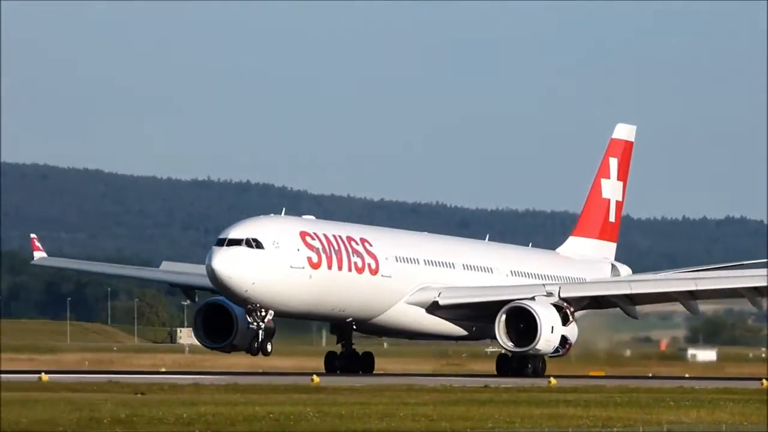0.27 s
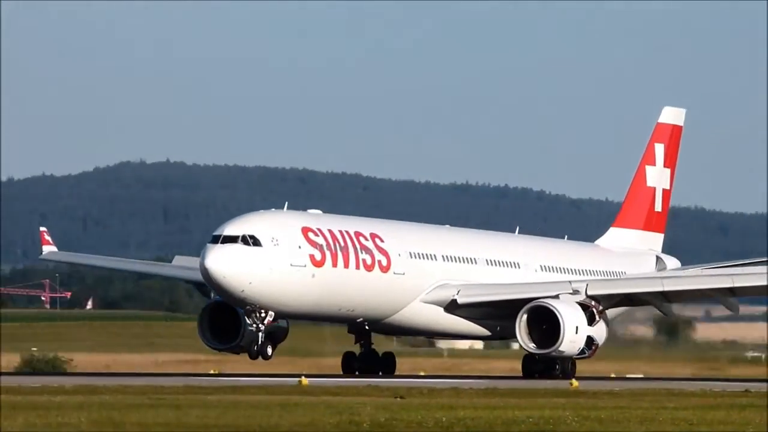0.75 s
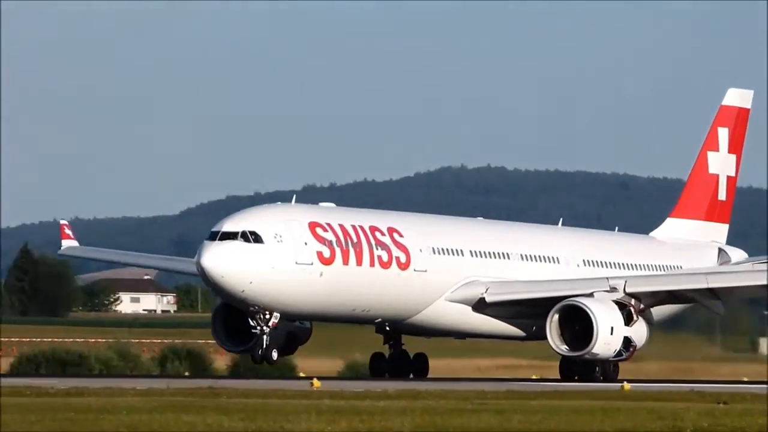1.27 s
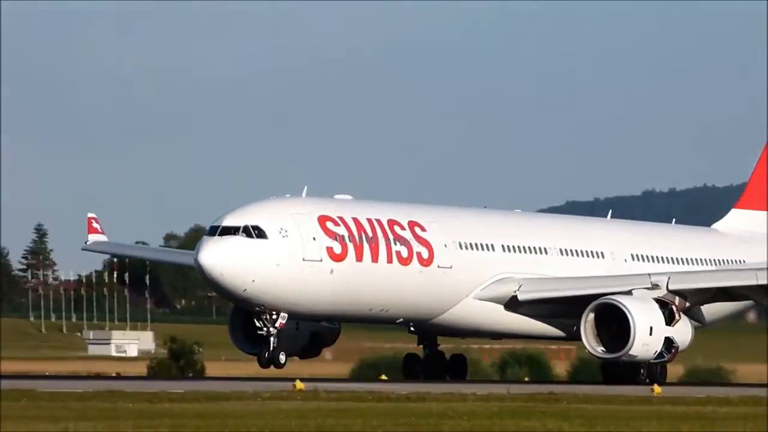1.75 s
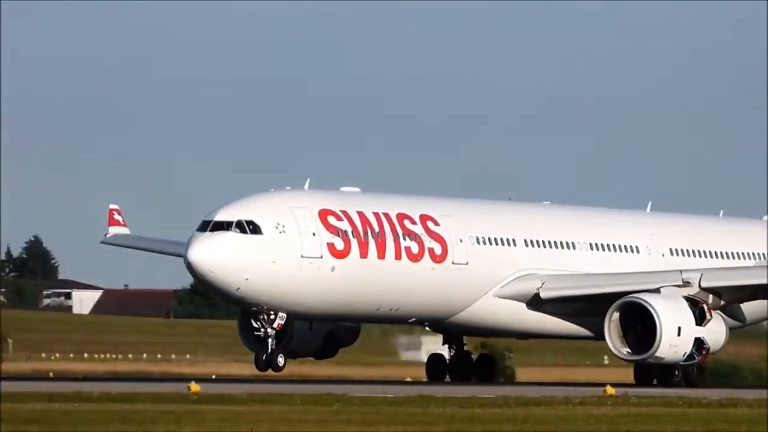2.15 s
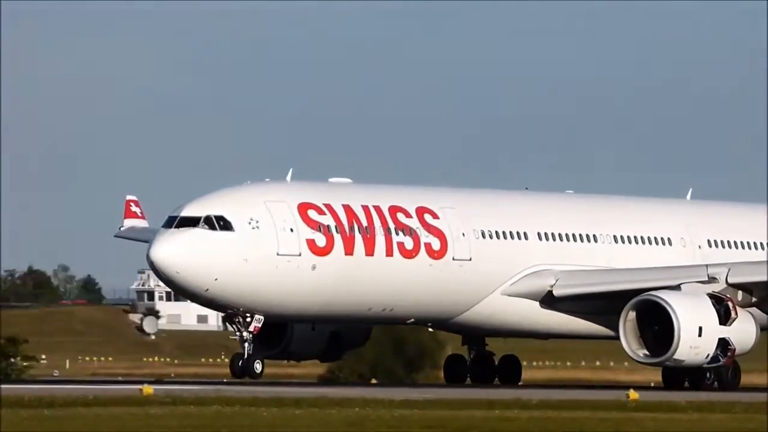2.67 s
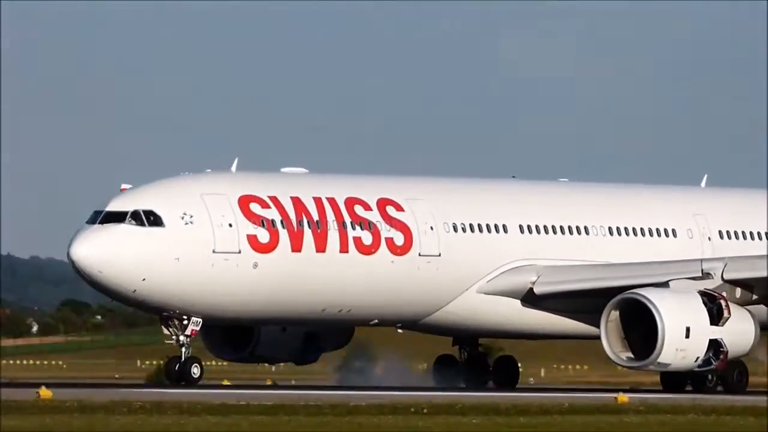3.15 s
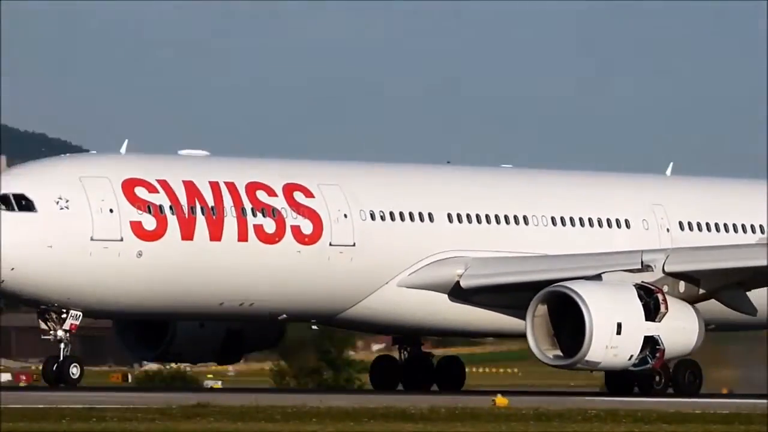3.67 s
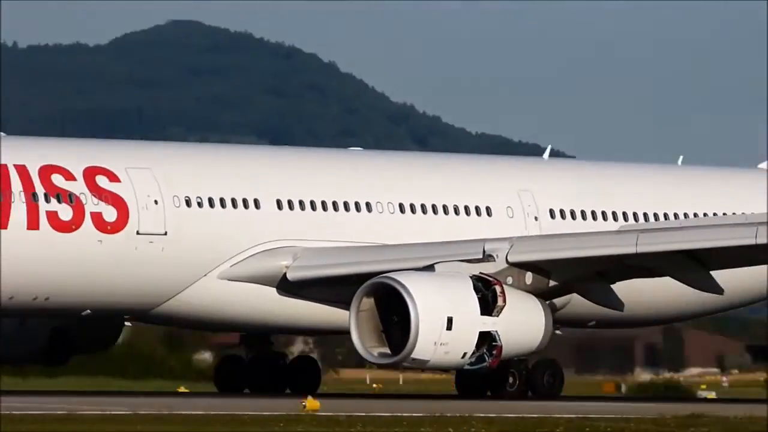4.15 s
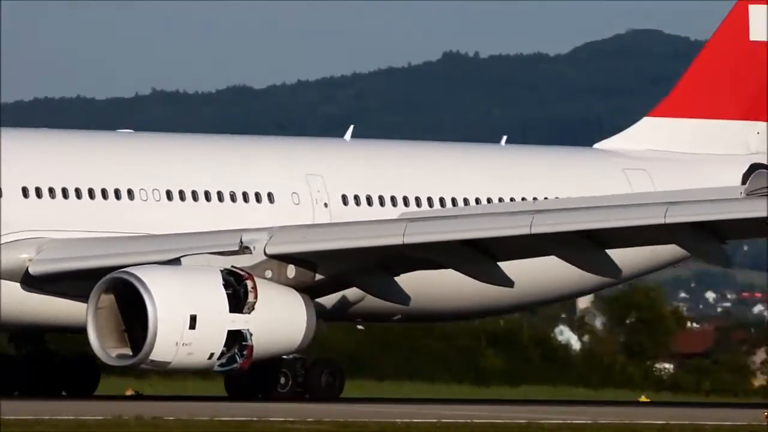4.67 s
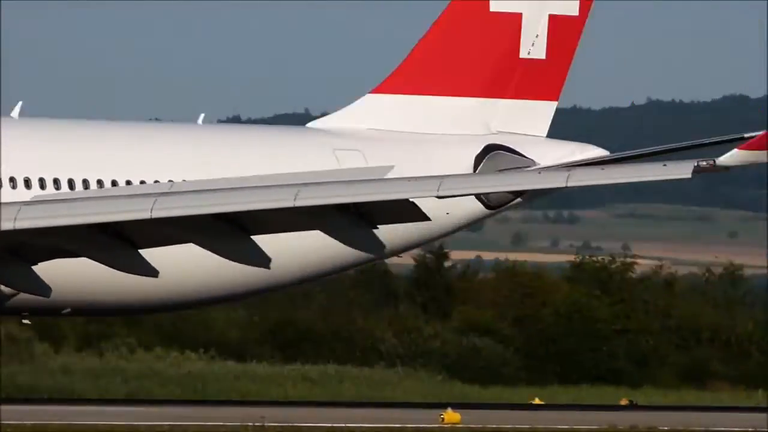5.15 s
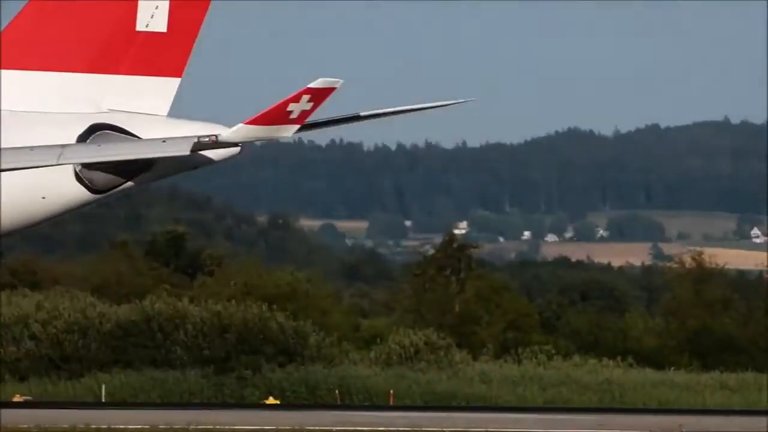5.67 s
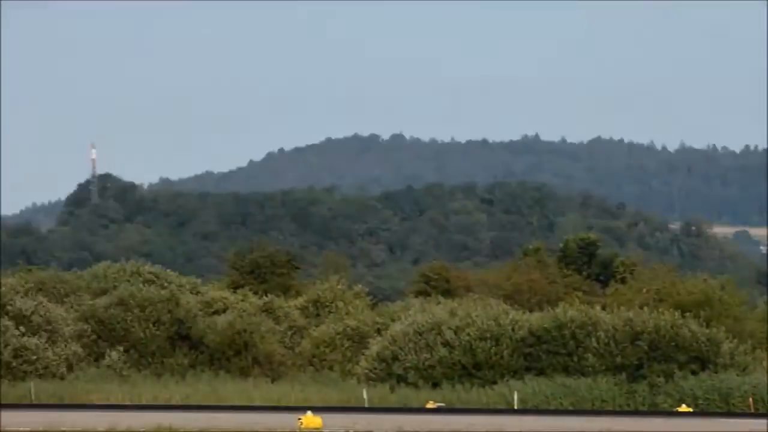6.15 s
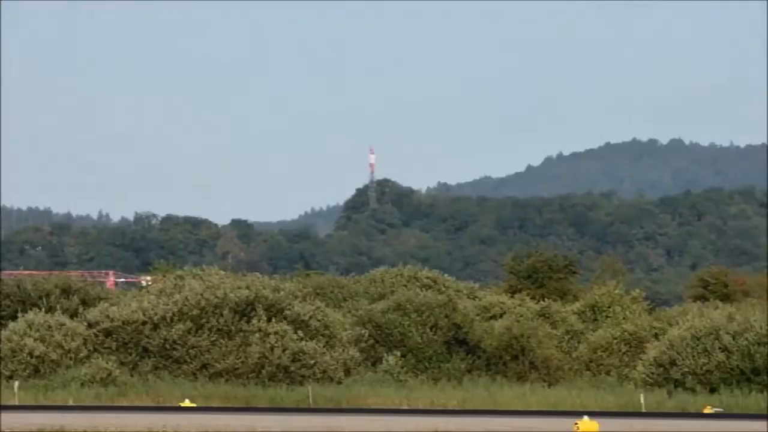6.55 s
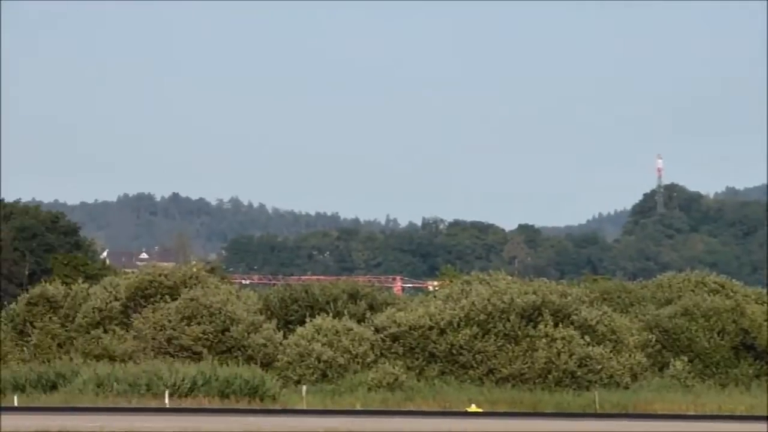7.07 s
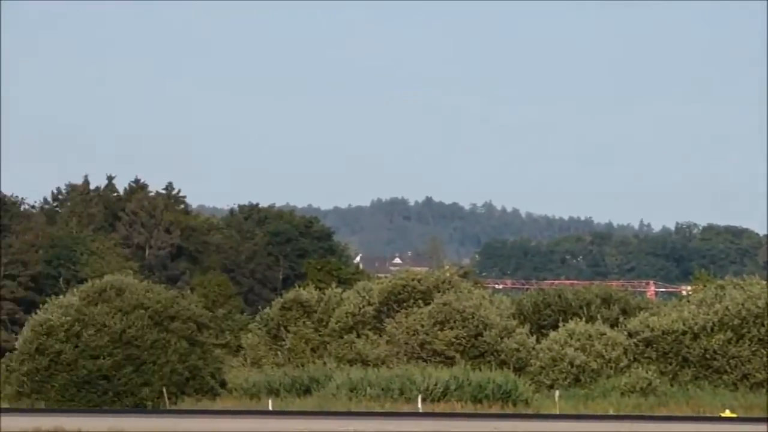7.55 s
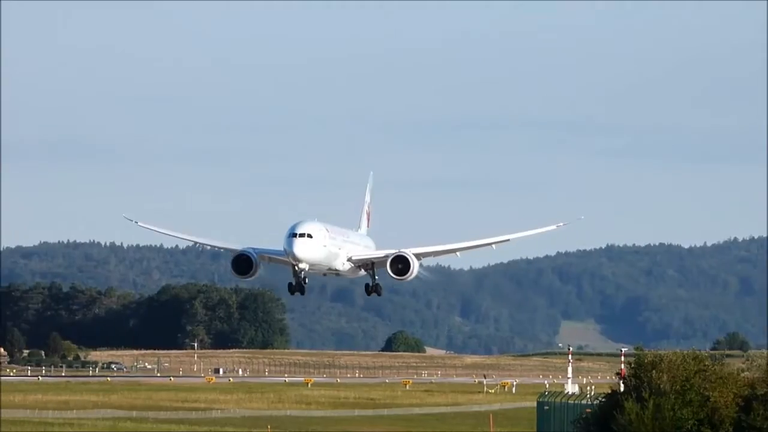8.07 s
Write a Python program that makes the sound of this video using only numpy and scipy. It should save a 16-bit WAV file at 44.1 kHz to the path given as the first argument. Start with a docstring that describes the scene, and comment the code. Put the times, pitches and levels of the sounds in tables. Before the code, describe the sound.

Outdoors on grass beside a runway, a large jet airliner is already loud at 0 s, rolling out with reversers open. A coarse buzz near 600 Hz fades during the first second, over a thick, gusting mid-range roar and low rumble. A blurred fan tone near 1.3 kHz is strongest around 1.7 s, while high turbine whistles rise until about 1.8 s, then sink and fade by 4 s. Wheels drone deeply, with a soft boom at 3.4 s. From 4.3 s the hiss brightens and surges, harshest and most ragged from 5.6 to 7.6 s as the engines pass; the blade tone slides downward and buzz returns. The image drifts slightly from right to left. At 7.7 s it cuts to a very brief silence, then until 8.3 s a duller, distant approaching jet roars with a faint fan tone and whine.

```python
"""Landing roll with thrust reversers, and a distant approach

An airliner rolls past on a runway with its reversers open, heard from the grass beside it. Shaped noise makes
the roar of the turned exhaust and the hiss of the reverser vanes, which brightens as they come abeam. Carriers
blurred by random modulation make the fan and turbine tones; a Doppler shift lowers the blade tone.
After a short silence a second, distant jet on approach sounds as duller noise with faint fan tones."""
import sys
import numpy as np
from scipy import signal
from scipy.fft import next_fast_len
from scipy.io import wavfile
from scipy.ndimage import uniform_filter1d

SR = 44100
rng = np.random.default_rng(int(sys.argv[2]) if len(sys.argv) > 2 else 0)


def int16_out(signal):
    """Quantize to a 16-bit WAV file."""
    q = np.round(np.clip(np.atleast_2d(signal).T, -1, 1) * 32767)
    wavfile.write(sys.argv[1], SR, q.astype(np.int16))


N = 366735  # samples
ROLL_END_S, APPROACH_START_S = 7.708, 7.775
FRAME, HOP = 1024, 256  # samples per spectral frame and between frames
TIME = np.arange(N) / SR
FRAME_S = np.arange(N // HOP + 2) * HOP / SR
BIN_HZ = np.maximum(np.fft.rfftfreq(FRAME, 1 / SR), 1)[:, None]


def undb(db):
    """Amplitude ratio: 20 dB is a factor of ten in gain."""
    return 10 ** (np.asarray(db) / 20)


def curves(table, at):
    """Linear interpolation: every column after the first, at the given times."""
    seconds, *columns = np.transpose(table)
    return [np.interp(at, seconds, column) for column in columns]


def colour(points, hz=BIN_HZ):
    """Spectral envelope: levels in dB joined by straight lines over log frequency."""
    point_hz, db = np.transpose(points)
    return np.interp(np.log(hz), np.log(point_hz), db)


def swell(at, peak, width):
    """Gaussian bump of unit height over time or frequency, above half height for the given width."""
    return np.exp2(-(2 * (at - peak) / width) ** 2)


def wander(rate_hz, size=N):
    """Band-limited randomness: complex Gaussian noise of unit power, spanning the whole scene."""
    hz = np.fft.fftfreq(next_fast_len(size), N / SR / size)
    spectrum = rng.standard_normal(len(hz)) + 1j * rng.standard_normal(len(hz))
    smooth = np.fft.ifft(spectrum * np.exp(-(hz / rate_hz) ** 2 / 2))[:size]
    return smooth / np.std(smooth)


def frame_flutter(rate_hz):
    """Slow random modulation: a real fluctuation of about unit rms, one value per frame."""
    return np.sqrt(2) * wander(rate_hz, len(FRAME_S)).real


def eddies(rate_hz, count):
    """Local turbulence: count frequency regions flutter in level independently, each blending into the next."""
    place = np.sqrt(BIN_HZ / BIN_HZ.max()) * (count - 1)
    share = np.exp(-(place - np.arange(count)) ** 2)
    share /= np.linalg.norm(share, axis=1, keepdims=True)
    return share @ np.array([frame_flutter(rate_hz) for _ in range(count)])


def turbulence(shape_db, level_db, flutter_db=0):
    """Flow noise: white noise under a moving spectrum, widest in stereo in the lowest bass and the treble."""
    # Each row: frequency in Hz, level of the side signal relative to the mid in dB
    side_width = [(30, -2), (60, -14), (110, -13), (190, -17.5), (340, -35), (610, -22.5), (1090, -19),
                  (1950, -18.5), (3480, -17.5), (6210, -13.5), (11100, -12)]
    gain = undb(shape_db)
    # the shape sets the colour alone; the level sets the strength
    gain = gain / np.sqrt(np.mean(gain ** 2, axis=0)) * undb(level_db + flutter_db)
    white = rng.standard_normal((2, (len(FRAME_S) - 1) * HOP))
    mid, side = signal.stft(white, nperseg=FRAME, noverlap=FRAME - HOP)[2] * gain
    side = side * undb(colour(side_width))
    left_right = np.array([mid + side, mid - side])
    return signal.istft(left_right, nperseg=FRAME, noverlap=FRAME - HOP)[1][:, :N]


def scattered(hz, width_hz, clear=0):
    """Scattering: turbulent air spreads a pure tone into a narrow hump, all but its clear share of power."""
    steady_flickers = 12  # the haze power is evened out over this many inverse widths
    carrier = np.exp(2j * np.pi * np.cumsum(hz) / SR)
    clear = np.clip(clear, 0, 1)
    haze = wander(width_hz / 2)
    haze_power = uniform_filter1d(np.abs(haze) ** 2, size=int(steady_flickers * SR / width_hz))
    haze = haze / np.sqrt(haze_power)
    return np.sqrt(2) * (carrier * (np.sqrt(clear) + np.sqrt(1 - clear) * haze)).real


def tone(table, width_hz, gain_db=0, clear=0):
    """Narrow-band source: a scattered tone on pitch and level curves, decaying outside the table's times."""
    hz, db = curves(table, TIME)
    outside_s = np.maximum(np.maximum(table[0][0] - TIME, TIME - table[-1][0]), 0)
    return scattered(hz, width_hz, clear) * undb(db + gain_db) * np.exp(-outside_s / 0.085)


def gusts_db(at):
    """Amplitude modulation by wind: gusts lift or thin the roar and the fan tones together."""
    # Each row: time of the peak in seconds, length in seconds, change in dB
    gusts = [(.5, .12, 1), (.74, .2, -2.3), (1.15, .05, -1), (1.29, .08, 1.2), (1.45, .05, -1.4),
             (1.595, .08, 1.8), (1.725, .07, 1.7), (1.91, .08, 1), (2.11, .06, -.9), (2.48, .08, 1),
             (3.43, .1, -1.5), (3.68, .16, 1), (3.925, .07, 1.6), (4.37, .085, -1.3), (4.47, .07, 1.6),
             (4.575, .08, 2), (4.98, .1, .9), (5.23, .06, 1), (5.44, .06, -1.5), (5.582, .08, 1.2),
             (6.61, .06, 1.2), (6.69, .06, -2), (6.97, .14, 1.6), (7.18, .05, -1.2)]
    return sum(change_db * swell(at, peak_s, length_s) for peak_s, length_s, change_db in gusts)


def grass_db():
    """Ground interference: the reflection from the grass cancels a band that slides down as its path changes."""
    # Each row: time in seconds, centre in Hz, change at the centre in dB
    ground_dip = [(.5, 690, 0), (1.5, 670, -4.5), (2.7, 640, -2), (3.2, 588, -5), (4, 550, 0)]
    hz, depth_db = curves(ground_dip, FRAME_S)
    return depth_db * swell(BIN_HZ, hz, 100)  # width in Hz


def roar_colour():
    """Spectral envelope of the roar: an upper edge sinks as the engines pass, and a trough drifts through."""
    # Each row: frequency in Hz, relative level per Hz in dB, before the edge and the trough
    roar_spectrum = [(350, -35), (600, -10), (800, 0.5), (950, 2), (1100, 1), (1400, 2.5), (1750, 0.5),
                     (2050, -1.5), (4000, -9), (7000, -8.5)]
    # Each row: time in seconds, upper edge in Hz
    roar_edge = [(0, 2130), (2.5, 2090), (4.5, 1960), (5.5, 1900), (7.7, 1790)]
    # Each row: time in seconds, centre of the trough in Hz, change at the centre in dB
    trough = [(0, 1470, 1.5), (1.6, 1475, -5), (3, 1574, -1), (3.7, 1590, -7), (5, 1600, -3),
              (6, 1520, -2.5), (7.7, 1380, -3.5)]
    edge_hz, = curves(roar_edge, FRAME_S)
    trough_hz, trough_db = curves(trough, FRAME_S)
    octaves_above = np.maximum(np.log2(BIN_HZ / edge_hz), 0)
    slope_db = 32 * octaves_above  # dB per octave
    return colour(roar_spectrum) - slope_db + trough_db * swell(BIN_HZ, trough_hz, 170)  # width in Hz


def exhaust():
    """Jet noise: large eddies rumble, small ones roar, the vanes hiss in surges; moving air makes all flutter."""
    # Each row: time in seconds, level of the roar in dB, before its offset and the gusts
    roar_levels = [(0, -22.5), (0.48, -22.5), (1.0, -20.5), (1.7, -21), (2.25, -21.5), (2.85, -20),
                   (3.25, -21), (3.7, -19.5), (4.2, -22.3), (5, -21.5), (5.7, -23.5), (6.4, -25),
                   (7.3, -24), (7.7, -23.5)]
    # Each row: time in seconds, level of the rumble in dB, before its offset
    rumble_levels = [(0, -29.5), (0.3, -30), (1.4, -31.5), (3.1, -32.5), (4.6, -32.5), (5.1, -32),
                     (5.9, -33), (7.3, -30.5), (7.7, -31)]
    # Each row: time in seconds, level of the hiss in dB before its offset, brightness in dB;
    # both before the surges
    vanes = [(0, -36.5, -26), (0.8, -30.5, -25), (1.85, -34, -22.5), (2.6, -31, -20), (3.8, -33, -17),
             (4.35, -31.5, -14), (5.85, -28, -8), (6.45, -29, -7.5), (7, -29.5, -6), (7.7, -31.5, -11)]
    # The hiss surges and drops away as the reversers come abeam and pass.
    # Each row: time of the peak in seconds, length in seconds, rise in dB, brightening in dB
    surges = [(4.28, .08, 1, 1.5), (4.38, .06, -1.3, 0), (4.58, .11, 2, 2.4), (4.675, .04, -1, -2),
              (4.89, .04, -1.5, -1.5), (5.385, .06, 1.5, 2), (5.435, .035, -.5, -2.2),
              (5.62, .03, -1.5, -1.5), (5.68, .055, 2.2, 2), (5.8, .055, 4.8, -.5), (5.94, .035, -1, -2),
              (5.99, .03, 4.5, 0), (6.085, .04, 3, -1.5), (6.135, .035, -1.5, 0), (6.195, .04, 4, -.5),
              (6.27, .06, 2, 0), (6.38, .08, -1, -1), (6.78, .08, 2, -1.5), (7.04, .05, 1.5, 0),
              (7.23, .16, -.5, -1.3), (7.38, .075, 4.5, .8), (7.48, .05, -1, -.5), (7.56, .055, 4.2, 2)]
    # Each row: frequency in Hz, relative level per Hz in dB; the grass dip is added to the rumble
    rumble_spectrum = [(25, -34.5), (48, -43.5), (70, -32.5), (110, -19), (165, -14.5), (230, -12),
                       (285, -1.5), (350, -10.5), (450, 1), (580, 1), (700, -5.5), (1000, -16.5),
                       (2000, -64)]
    # Each row: frequency in Hz, relative level per Hz in dB, before the treble tilt
    hiss_spectrum = [(1200, -25), (2200, 3.5), (3050, 0.5), (3600, -1.5), (4100, 1.15), (5000, -2),
                     (6000, -4.5), (7000, -8), (8500, -14.5), (10000, -25), (11300, -42.5), (12500, -53)]
    roar_offset_db, rumble_offset_db, hiss_offset_db = 1.5, 2.5, 3.5

    roar_db, = curves(roar_levels, FRAME_S)
    rumble_db, = curves(rumble_levels, FRAME_S)
    hiss_db, bright_db = curves(vanes, FRAME_S)
    for peak_s, length_s, rise_db, brightening_db in surges:
        surge = swell(FRAME_S, peak_s, length_s)
        hiss_db = hiss_db + rise_db * surge
        bright_db = bright_db + brightening_db * surge

    # small eddies on the way shake the whole exhaust, by 0.24 dB rms at about 13 Hz
    shake_db = 0.24 * frame_flutter(13)
    rumble_db = rumble_db + rumble_offset_db + shake_db
    rumble = turbulence(colour(rumble_spectrum) + grass_db(), rumble_db, 0.72 * eddies(23, count=30))
    roar_db = roar_db + roar_offset_db + gusts_db(FRAME_S) + shake_db
    roar = turbulence(roar_colour() + grass_db(), roar_db, 0.54 * eddies(8.2, count=28))
    # air soaks up the treble while the engines are far off and face the listener
    treble_tilt_db = np.clip((BIN_HZ - 3800) / 2900, -.1, 2.4) * (bright_db + 7.0)
    hiss_db = hiss_db + hiss_offset_db + 0.11 * bright_db + shake_db
    hiss = turbulence(colour(hiss_spectrum) + treble_tilt_db, hiss_db, 0.65 * eddies(20, count=12))
    return rumble + roar + hiss


def wheels():
    """Rolling noise: the heavy gear drones on the runway as a narrow hump of noise, and booms now and then."""
    # Each row: time in seconds, pitch in Hz, level in dB before the booms
    drone = [(0, 105, -56), (.5, 105, -55.5), (1.1, 96, -51), (2, 103, -51.5), (3.4, 106, -51),
             (4.2, 100, -54), (5.2, 97, -50.5), (5.8, 97, -56.5), (7.7, 95, -60)]
    # The strongest boom comes as the nose wheels come down.
    # Each row: time of the peak in seconds, length in seconds, rise in dB
    booms = [(1.16, 0.18, 3), (1.56, .12, 3), (2.54, .12, 4), (3.42, .15, 7)]
    booms_db = sum(rise_db * swell(TIME, peak_s, length_s) for peak_s, length_s, rise_db in booms)
    return tone(drone, 42, gain_db=booms_db)


def doppler():
    """Doppler effect: the pitch ratio of a source on a straight path depends on its speed towards the listener."""
    speed_m_s, nearest_m, abeam_s, sound_m_s = 55, 110, 5.58, 343
    along_m = speed_m_s * (TIME - abeam_s)
    receding = along_m / np.hypot(along_m, nearest_m)
    return 1 / (1 + speed_m_s / sound_m_s * receding)


def blades():
    """Blade-passing tones and duct resonance: scattered humps, of which the blade tone is Doppler-shifted."""
    # Lobes of the blade tone sweep over the listener.
    # Each row: time of the peak in seconds, length in seconds, rise in dB
    blade_lobes = [(2.3, 0.89, 8.5), (3.85, 0.3, 6), (5.3, 0.65, 8.5), (6.616, 0.085, 3.5), (6.85, 1, 13),
                   (7.651, 0.4, 8.5)]
    # Broad fan tone. Each row: time in seconds, pitch in Hz, level in dB before the gusts
    fan_curve = [(0, 1243, -27), (.75, 1278, -27.5), (1.3, 1284, -24), (1.75, 1287, -22.5),
                 (2.2, 1284, -24.5), (2.8, 1290, -27), (3.25, 1307, -35), (3.7, 1332, -28),
                 (4.2, 1339, -31), (5, 1331, -29), (6.1, 1250, -32), (7.7, 1225, -36)]
    # Low fan tone. Each row: time in seconds, pitch in Hz, level in dB before the gusts
    low_fan_curve = [(4.6, 955, -37.5), (5.3, 915, -37), (6.3, 930, -31), (7.7, 913, -36)]
    # Howl of the fan duct. Each row: time in seconds, centre in Hz, level in dB before the gusts
    howl_curve = [(0, 1640, -29.5), (.5, 1718, -26), (.7, 1688, -30), (1.7, 1640, -29.5), (2.3, 1800, -27),
                  (3.3, 1805, -33.5), (4.5, 1805, -32.5), (5.3, 1805, -29.5), (5.9, 1755, -34.5),
                  (6.3, 1700, -35)]
    # Buzz-saw tone of the fan while the intakes face the listener.
    # Each row: time in seconds, pitch in Hz, level in dB
    early_buzz = [(0, 572, -21), (.05, 573, -22), (.11, 574, -35), (.23, 577, -35), (.32, 583, -24.5),
                  (.41, 596, -29), (.56, 592, -32), (.66, 597, -27.5), (.78, 600, -35), (.97, 608, -30.5),
                  (1.3, 600, -43)]
    # Faint buzz about an octave under it. Each row: time in seconds, pitch in Hz, level in dB
    low_buzz = [(.2, 286.3, -57), (.35, 292, -38), (.7, 294.6, -42), (1.1, 301, -50)]
    # The buzz returns as the engines pass. Each row: time in seconds, pitch in Hz, level in dB
    late_buzz = [(5, 660, -39), (5.8, 630, -35.5), (6.2, 645, -39), (6.52, 646, -30), (6.66, 645, -38),
                 (6.83, 642, -33), (7.1, 634, -34), (7.3, 626, -31), (7.42, 618, -35), (7.55, 612, -29.5),
                 (7.7, 612, -33)]
    # Broad whine from the intakes. Each row: time in seconds, pitch in Hz, level in dB
    early_whine = [(0, 2285, -34), (.5, 2250, -30), (1, 2226, -32), (1.5, 2193, -35)]
    # Higher whine as the engines pass. Each row: time in seconds, pitch in Hz, level in dB before its gain
    late_whine = [(5.2, 4210, -41), (5.9, 3985, -34), (6.4, 3974, -37), (7, 3884, -33), (7.3, 3900, -46)]
    # Broad whistle from the open reversers as they come abeam.
    # Each row: time in seconds, pitch in Hz, level in dB
    vane_whistle = [(4.6, 3770, -58), (5.05, 3640, -34.5), (5.6, 3482, -40), (6.3, 3270, -38)]
    blade_rest_hz, between_lobes_db = 1793, -40.5

    gust_db = gusts_db(TIME)
    lobes_db = sum(rise_db * swell(TIME, peak_s, length_s) for peak_s, length_s, rise_db in blade_lobes)
    passing = scattered(blade_rest_hz * doppler(), 125) * undb(between_lobes_db + lobes_db)
    fan = tone(fan_curve, 170, gain_db=1.4 * gust_db)  # gusts move it more than the roar
    duct = tone(low_fan_curve, 140) + tone(howl_curve, 210)
    buzz = tone(early_buzz, 47, clear=.9) + tone(low_buzz, 30) + tone(late_buzz, 65, clear=.2)
    whine = tone(early_whine, 180) + tone(late_whine, 300, gain_db=-1.0) + tone(vane_whistle, 380)
    return (passing + duct) * undb(gust_db) + fan + buzz + whine


def turbine():
    """Directivity: three stages on one shaft whistle as their beams pass; hot, moving air makes them shimmer."""
    # The turbine spools up, then sinks. Each row: time in seconds, middle stage pitch in Hz before the waver
    shaft_curve = [(0, 4540), (.5, 4850), (.9, 5100), (1.15, 5310), (1.5, 5490), (1.8, 5515), (2.2, 5400),
                   (2.6, 5290), (3.1, 5240), (3.7, 5000), (4.1, 4920)]
    # Blade counts of the front, middle and rear stages, relative to the middle one
    stage_ratios = [1.147, 1, .85]
    # Each stage whistles when its beam meets the listener. Each row: time of the peak in seconds,
    # length in seconds, stage 0 to 2, level in dB before the shimmer
    whistles = [(1.35, .25, 0, -58), (1.72, .4, 0, -55.5), (2.15, .25, 0, -58.5), (3.35, .22, 0, -51.5),
                (.2, .25, 1, -56), (1.12, .28, 1, -46.5), (1.33, .1, 1, -48), (1.68, .5, 1, -49.5),
                (2.18, .2, 1, -49.5), (2.42, .16, 1, -49.5), (2.8, .5, 1, -52), (3.6, .4, 1, -52),
                (1.55, .5, 2, -49), (2.22, .5, 2, -45), (2.85, .5, 2, -47)]
    shimmer_hz = 16
    # the real part of wander has an rms of 0.71, which scales both the waver and the shimmer
    waver_scale, shimmer_scale_db = .0018, 2.
    hz, = curves(shaft_curve, TIME)
    hz = hz * (1 + waver_scale * wander(shimmer_hz).real)
    out = 0
    for k, ratio in enumerate(stage_ratios):
        beam = sum(swell(TIME, peak_s, length_s) * undb(db)
                   for peak_s, length_s, stage, db in whistles if stage == k)
        shimmer = undb(shimmer_scale_db * wander(shimmer_hz).real)
        out = out + scattered(hz * ratio, 60, clear=.45) * beam * shimmer
    return out


def distant_jet():
    """Far-field jet noise: a dull roar of shaped noise with scattered fan tones and intake hiss."""
    # Each row: time in seconds, level of the roar in dB, before its offset
    approach_levels = [(7.77, -26.5), (7.85, -28), (8.05, -28), (8.16, -26.5), (8.32, -28.5)]
    # Each row: frequency in Hz, relative level per Hz in dB
    far_spectrum = [(30, -20), (75, -42), (150, -9.5), (340, -6.5), (450, 3), (690, -4.5), (850, 1),
                    (1220, 5.5), (1420, -9.5), (2250, -7.5), (2700, -26), (3600, -34.5), (8000, -46),
                    (15000, -57)]
    # Fan tone. Each row: time in seconds, pitch in Hz, level in dB
    far_fan = [(7.77, 1140, -51), (8.03, 1207, -31), (8.32, 1132, -46)]
    # Whine. Each row: time in seconds, pitch in Hz, level in dB
    far_whine = [(7.77, 2345, -55), (8.05, 2280, -52), (8.22, 2230, -42.5), (8.32, 2210, -43)]
    # Intake hiss, louder towards the end. Each row: time in seconds, centre in Hz, level in dB
    far_hiss = [(7.77, 2930, -61), (8.05, 2930, -69), (8.2, 2870, -55), (8.32, 2884, -58)]
    level_db, = curves(approach_levels, FRAME_S)
    roar = turbulence(colour(far_spectrum), level_db - 0.5, .7 * eddies(7, count=28))
    return roar + tone(far_fan, 200) + tone(far_whine, 150) + tone(far_hiss, 420)


def scene():
    """Level-difference panning: the roll-out crosses from right to left; then the next jet approaches."""
    # Each row: time in seconds, left minus right level in dB; the wheels stay central
    bearing = [(0, -.5), (4.1, -1), (6, 0), (7.7, 2)]
    pan_db, = curves(bearing, TIME)
    pan = undb(np.array([pan_db, -pan_db]) / 2)
    near = (exhaust() + blades() + turbine()) * pan + wheels()
    return np.where(TIME < ROLL_END_S, near, distant_jet())


def record(dry):
    """Linear filtering and gating: two narrow dips, a silence between the jets, a short fade-in, a cut top."""
    # Each row: centre in Hz, width in Hz, change at the centre in dB
    dips = [(383, 36, -15), (4360, 220, -6)]
    for hz, width_hz, depth_db in dips:
        band = signal.lfilter(*signal.iirpeak(hz, hz / width_hz, fs=SR), dry)
        dry = dry - (1 - undb(depth_db)) * band
    sounding = 1. * ((TIME < ROLL_END_S) | (TIME > APPROACH_START_S))
    sounding = uniform_filter1d(sounding, size=96)  # soft edges
    fade_in = np.minimum(TIME / .002, 1)
    low_pass = signal.ellip(8, .2, 70, 11700, fs=SR, output="sos")  # ripple dB, stopband dB, edge Hz
    return signal.sosfilt(low_pass, dry * sounding * fade_in)


dry = scene()
out = record(dry)
int16_out(out)
```